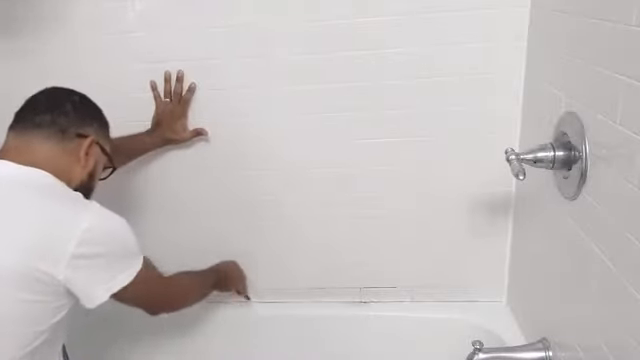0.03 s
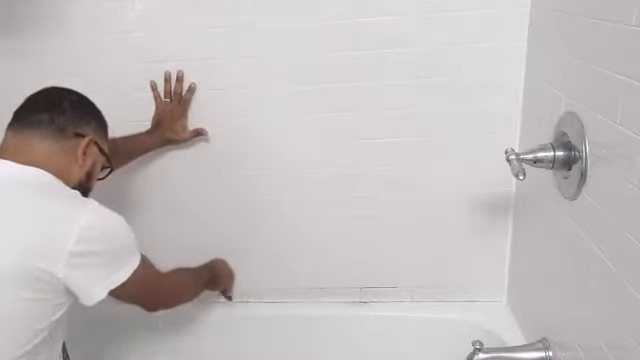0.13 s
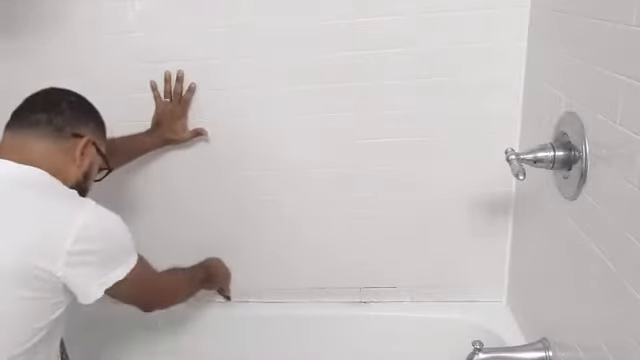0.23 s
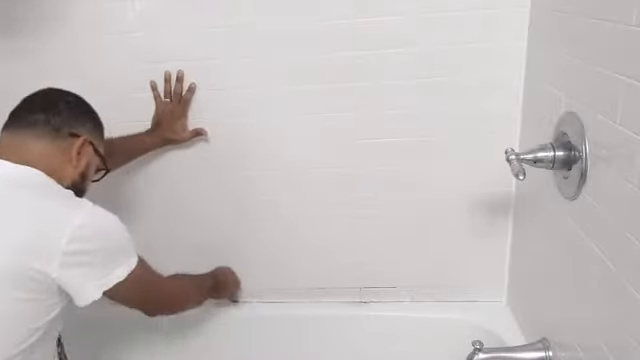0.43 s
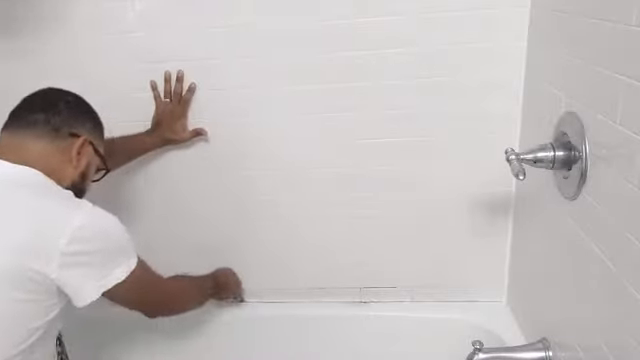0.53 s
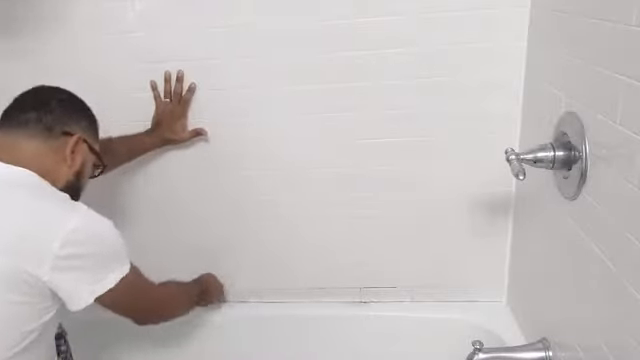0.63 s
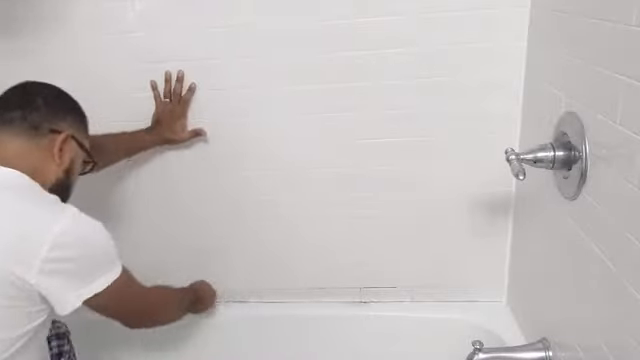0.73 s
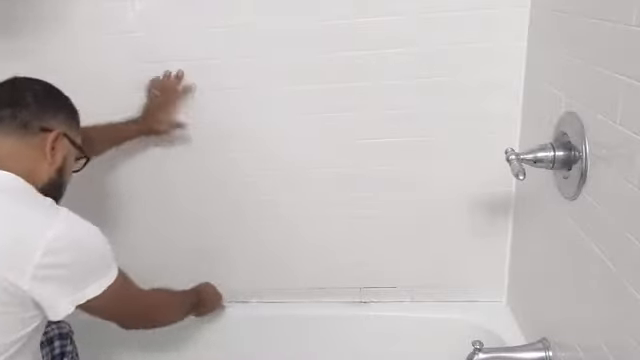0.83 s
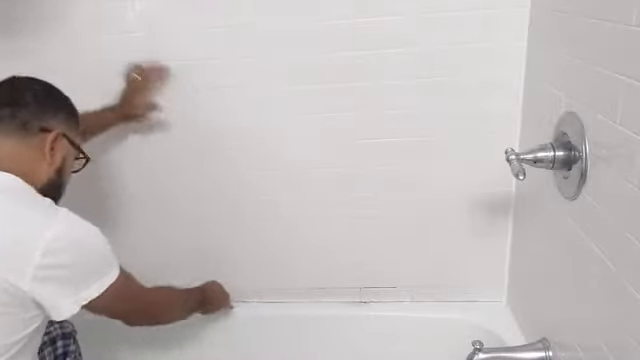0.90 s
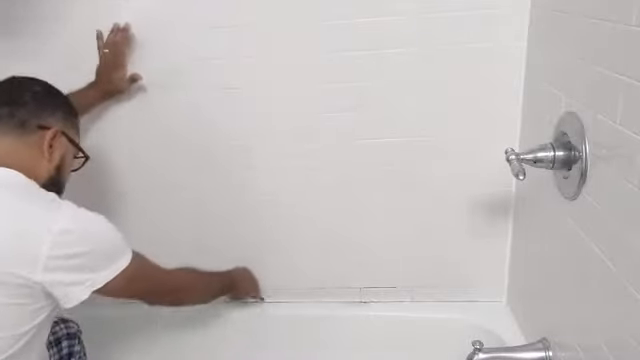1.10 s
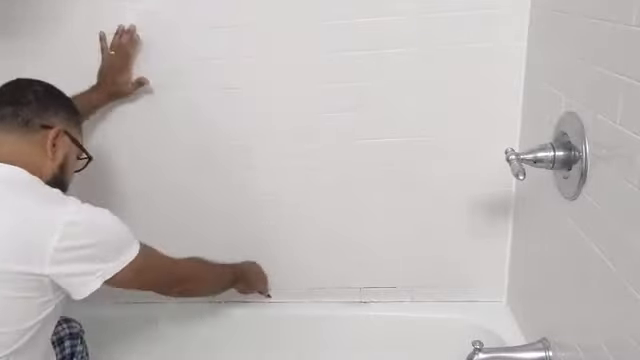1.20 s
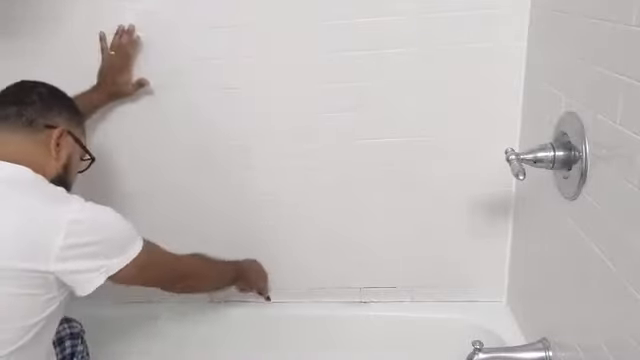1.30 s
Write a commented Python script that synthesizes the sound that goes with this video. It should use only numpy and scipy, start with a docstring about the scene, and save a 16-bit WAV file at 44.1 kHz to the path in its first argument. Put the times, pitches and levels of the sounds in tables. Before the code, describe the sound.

Close by in a small tiled bathroom, a blade scrapes grittily between tub and wall twice, first sharp and squeaky, then heavier. The hollow tub knocks and thuds softly as the scraping fades to quiet.

```python
"""A small tiled bathroom, heard in stereo from close by the tub. A steel hand tool scrapes old caulk
from the joint between tub and wall: one sharp stroke, then a duller, heavier one. The edge sticks and
slips; each slip crumbles grit, rings the blade and shakes the wall and the hollow tub. Now and then
the blade squeaks or catches. The tiles ring on over the faint air of the house, and the tub gives soft
low thuds as weight shifts against it."""
import sys
import numpy as np
from scipy import signal
from scipy.fft import rfft, irfft
from scipy.io import wavfile
from scipy.ndimage import uniform_filter1d

SR = 44100
rng = np.random.default_rng(int(sys.argv[2]) if len(sys.argv) > 2 else 0)


def wrap_up_sound(samples):
    """Save the sound to the file named by the first command line argument, as 16-bit audio."""
    columns = np.atleast_2d(samples).T
    # keep every value between -1 and 1, then stretch to whole-number steps
    tamed = np.clip(columns, -1, 1)
    steps = np.round(tamed * 32767).astype(np.int16)
    wavfile.write(sys.argv[1], SR, steps)


N = 59535
T = np.arange(N) / SR
FREQS = np.maximum(np.arange(N + 1) * SR / (2 * N), 1)

# spectra of the room tone and the scrape's parts (frequency [Hz], relative density [dB])
AIR_SPECTRUM = [(20, -4.5), (35, 2), (60, -11), (100, -18.5), (200, -10), (450, -10.5), (800, -12),
                (1500, -16.5), (4000, -29.5), (8000, -34.5), (15000, -33.5)]
TUB_SPECTRUM = [(70, -34.5), (115, -28), (180, 0), (260, 1), (400, 3), (560, -8.5), (900, -12.5),
                (1600, -46), (4000, -38.5)]
WALL_SPECTRUM = [(100, -35), (280, -21.5), (450, -5), (620, -5), (800, -4), (980, -7), (1200, -12.5),
                 (1500, -12.5), (2500, -19.5), (6000, -52)]
RASP_SPECTRUM = [(300, -26.5), (1000, -13.5), (1900, -11.5), (2700, -0.5), (3300, 5), (4400, 0),
                 (5300, -3.5), (6500, -11), (15000, -28)]
GRIT_SPECTRUM = [(1500, -27.5), (4000, 4.5), (5500, 3.5), (7000, -1.5), (8300, -1), (9300, 3),
                 (11800, -1.5), (13000, 1), (15000, -8.5)]
TICK_SPECTRUM = [(2000, -26), (6000, -5), (11000, -8), (13000, 0), (15000, 4)]
# pushes of the tool and how hard they drive each part (start [s], attack [s], length [s], tub [dB],
# wall [dB], free blade [dB], pressed blade [dB], rasp [dB], grit [dB])
TOOL_PUSHES = [(0.0, 0.00033, 0.0057, -53.5, -59.5, -67, -73, -37.5, -49),
               (0.043, .01, 0.056, -77, -64.5, -90, -69, -67, -68),
               (0.157, 0.0039, 0.0055, -73, -58, -80, -72, -49.5, -54),
               (0.175, 0.013, 0.031, -60.5, -60, -70, -56.5, -42, -46.5),
               (0.219, 0.0047, 0.02, -59, -46.5, -32.5, -47, -29.5, -31),
               (0.242, 0.0027, 0.043, -43, -33, -42.5, -41.5, -37.5, -42),
               (0.32, 0.0019, 0.037, -82, -41, -62, -49, -48.5, -69),
               (0.372, 0.0022, 0.041, -68, -38, -60, -41, -45, -53),
               (0.426, 0.0068, 0.037, -59.5, -48.5, -61, -62, -56, -63),
               (0.505, .014, .042, -61.5, -57, -90, -55.5, -50.5, -52),
               (0.561, .001, 0.011, -81, -66, -87, -66, -47.5, -45.5),
               (0.578, 0.0084, 0.099, -68.5, -65, -73, -69, -53.5, -61),
               (0.668, 0.014, 0.067, -65, -50, -79, -60, -45.5, -50.5),
               (0.687, 0.0071, 0.0225, -41, -56, -80, -70, -77, -71),
               (0.729, 0.0077, 0.028, -52, -39.5, -63, -57, -38, -45),
               (0.755, 0.0044, 0.036, -33.5, -39.5, -48, -77, -37.5, -45),
               (0.794, 0.0058, 0.028, -43, -35.5, -74, -50.5, -37.5, -49),
               (0.838, 0.0054, 0.025, -47, -48.5, -64, -75, -47, -56),
               (0.868, 0.007, 0.079, -68, -60, -85, -61, -51.5, -50),
               (0.977, 0.011, .04, -62.5, -85, -96, -92, -62, -90),
               (1.323, 0.0022, .03, -65, -76, -86, -70, -58, -69)]
# modes of the tub, the free blade, the pressed (damped) blade, its thin edge, the floor's sway
# and the tub's boom (frequency [Hz], relative energy [dB], t60 [s])
TUB_RING_MODES = [(135.3, -9, 0.28), (189.2, 1, 0.16), (261.5, -6, .17), (337, -3.5, 0.21),
                  (396.8, 0, 0.32), (466, -1, 0.23), (570, -17, 0.36), (736, -15, 0.19), (876, -7, .2)]
FREE_BLADE_MODES = [(1748, -1, 0.081), (1767, -2, 0.044), (2790, 2.5, 0.066), (4060, -13, .05),
                    (5025, -6.5, 0.041), (11200, -19, .015), (11500, -4, .015)]
PRESSED_BLADE_MODES = [(1719, -4, 0.013), (1800, 1, 0.015), (2098, -5, 0.048), (2234, -9, 0.029),
                       (2722, -10.5, 0.051)]
BLADE_EDGE_MODES = [(2667, 5.5, 0.034), (2794, -5.5, 0.069), (3119, -1, 0.037), (3557, -5, 0.12),
                    (4380, -15, 0.021), (5360, -10.5, 0.045)]
FLOOR_SWAY_MODES = [(23.2, 6, 0.63), (51, -11, 1), (74.5, -9.5, .35)]
TUB_BOOM_MODES = [(133, 1.5, 0.33), (162, -7.5, 0.047), (215.3, -3, 0.2)]
# decay of the tiled room (frequency [Hz], t60 [s])
ROOM_DECAY = [(150, 0.34), (400, 0.77), (900, 0.53), (2500, 0.48), (6000, 0.61), (14000, 0.37)]
# likeness of left and right at the microphone (frequency [Hz], correlation [-1..1])
MIC_CORRELATION = [(30, 1), (70, 0.11), (150, 0.93), (300, 0.86), (600, 0.45), (1500, -0.16),
                   (4000, -0.015), (14000, -0.2)]
# the blade locks into a squeak (start [s], length [s], pitch [Hz], level into the room [dB])
BLADE_SQUEAKS = [(0.214, 0.028, 1765, -36), (0.257, 0.04, 1726, -39), (0.773, 0.098, 3088, -53.5)]
# weight shifts against the tub (time [s], sway peak [dB], boom peak [dB])
WEIGHT_SHIFTS = [(0.246, -64, -50), (0.51, -86, -59), (0.636, -72, -52.5), (0.69, -68, -48),
                 (0.937, -49, -90), (1.15, -42.5, -51.5), (1.327, -63, -57)]
# the tool catches on the joint (time [s], knock drive [dB], tick drive [dB])
TOOL_CATCHES = [(0.277, -18.5, -28), (0.561, -55, -31), (0.776, -13.5, -32), (0.919, -29.5, -38)]

SLIPS_PER_S, SLIP_SCATTER, SLIP_SPREAD_DB = 480, .55, 2
CRUMBS_PER_S, CRUMB_SPREAD_DB, CRUMBLE_S = 6800, 4, 0.0013
RELEASE_S = 0.0063
LEDGE_GAIN, LEDGE_NEAR_S, LEDGE_FAR_S = 0.82, .0004, .0025  # the tub's ledge reflects the edge
TUB_RING_DB, TUB_KNOCK_DB, TUB_LOW_CUT_HZ = -3, 1.5, 108
EDGE_RING_DB, EDGE_RASP_DB = -5.5, -2
BUILD_S, EARLY_DB, EARLY_T60_S = .001, 5.5, 0.17  # first reflections inside the alcove
SQUEAK_FADE_S, SQUEAK_WOBBLE, WOBBLE_PER_S = 0.0059, 0.0119, 350
AIR_DB, DIRECT_DB, TUB_ROOM_DB, TUB_DIRECT_DB = -62, -9, -10, -1
LEFT_DB, TREBLE_RIGHT_DB, TOP_HZ = 0.43, 1.5, 15150


def undb(db):
    """Decibels to gain."""
    return 10 ** (np.asarray(db) / 20)


def curve(points, hz=FREQS):
    """Read a table on a log-frequency axis."""
    freqs, values = np.array(points, float).T
    return np.interp(np.log(hz), np.log(freqs), values)


def unit(response):
    """Scale a response to unit energy."""
    return response / np.sqrt(np.sum(response ** 2, axis=-1, keepdims=True))


def shape(sound, gain):
    """Apply a gain per frequency."""
    return irfft(rfft(sound, 2 * N) * gain)[..., :N]


def through(sound, response):
    """Send a sound through a response."""
    return shape(sound, rfft(response, 2 * N))


def colour(spectrum):
    """Short causal response with the given spectrum."""
    cepstrum = irfft(np.log(undb(curve(spectrum))))
    causal = 2 * cepstrum[:N] * (T > 0)
    return unit(irfft(np.exp(rfft(causal, 2 * N)))[:N])


def decay(t60):
    """Envelope that falls 60 dB in t60 seconds."""
    return np.exp(-np.log(1000) * T / t60)


def ring(modes):
    """Response of a body: decaying sines of alternating sign."""
    return unit(sum((-1) ** k * undb(db) * unit(np.sin(2 * np.pi * hz * T) * decay(t60))
                    for k, (hz, db, t60) in enumerate(modes)))


def stereo(pair):
    """Blend two unrelated signals into left and right, most alike in the bass."""
    likeness = curve(MIC_CORRELATION)
    mid, side = shape(pair, np.sqrt(np.array([1 + likeness, 1 - likeness]) / 2))
    return np.array([mid + side, mid - side])


def room_tone():
    """Still air of the house: faint rumble and hiss all around the microphone."""
    return undb(AIR_DB) * stereo(through(rng.standard_normal((2, N)), colour(AIR_SPECTRUM)))


def friction():
    """Uneven slips of the edge, and the shower of crumbs that follows each."""
    gap, size = rng.standard_normal((3000, 2)).T
    at = (np.cumsum(np.exp(SLIP_SCATTER * gap)) / SLIPS_PER_S * SR).astype(int)
    slips = np.bincount(at[at < N], undb(SLIP_SPREAD_DB * size[at < N]), N)
    shower = np.sqrt(np.abs(through(slips ** 2, np.exp(-T / CRUMBLE_S))))
    breaks = rng.random(N) < CRUMBS_PER_S / SR
    crumbs = breaks * undb(CRUMB_SPREAD_DB * rng.standard_normal(N))
    return slips - slips.mean(), shower * crumbs * np.sign(rng.standard_normal(N))


def scraper():
    """Each push bites, holds and lets go; slips shake tub and wall, crumbs ring the blade and hiss."""
    slips, crumbs = friction()
    drive = np.zeros((7, N))  # tub, wall, free blade, pressed blade, rasp, grit, tick
    for start, attack, length, *levels in TOOL_PUSHES:
        bite = np.clip((T - start) / attack, 0, 1)
        push = bite * np.exp(-np.maximum(T - start - length, 0) / RELEASE_S)
        lag_s = rng.uniform(LEDGE_NEAR_S, LEDGE_FAR_S)
        echoed = crumbs + LEDGE_GAIN * np.roll(crumbs, int(lag_s * SR))
        force = unit(np.array([slips, slips, crumbs, crumbs, echoed, echoed]) * push)
        drive[:-1] += undb(levels)[:, None] * force * np.linalg.norm(push)
    drive[[0, -1]] += catches()
    edge = undb(EDGE_RING_DB) * ring(BLADE_EDGE_MODES) + undb(EDGE_RASP_DB) * colour(RASP_SPECTRUM)
    bodies = np.array([undb(TUB_KNOCK_DB) * colour(TUB_SPECTRUM), colour(WALL_SPECTRUM),
                       ring(FREE_BLADE_MODES), ring(PRESSED_BLADE_MODES), edge,
                       colour(GRIT_SPECTRUM), colour(TICK_SPECTRUM)])
    scrape, tub_force = through(drive, bodies).sum(axis=0), drive[0]
    return scrape, tub_force


def tub_ring(force):
    """The hollow tub, close to the microphone, rings under the tool's force."""
    low_cut = signal.butter(2, TUB_LOW_CUT_HZ, "high", fs=SR, output="sos")
    return through(force, signal.sosfilt(low_cut, undb(TUB_RING_DB) * ring(TUB_RING_MODES)))


def bathroom(sound):
    """The microphone gets weak direct sound and a dense, bright tail off the tiles; treble leans right."""
    noise, tail = rng.standard_normal((2, N)), 0
    for band_hz, t60 in ROOM_DECAY:
        band = curve([(hz, hz == band_hz) for hz, _ in ROOM_DECAY])
        fade = decay(t60) + undb(EARLY_DB) * decay(EARLY_T60_S)
        tail += shape(noise, band) * unit((1 - np.exp(-T / BUILD_S)) * fade)
    power = uniform_filter1d(np.abs(rfft(tail, 2 * N)) ** 2, size=60)
    flat_tail = shape(tail, power ** -.5)
    reverb = through(sound, stereo(flat_tail))
    lean_db = curve([(6000, -LEFT_DB), (13000, TREBLE_RIGHT_DB)])
    return shape(reverb + undb(DIRECT_DB) * sound, undb(np.array([-lean_db, lean_db]) / 2))


def squeaks():
    """Short, unsteady tones while the edge sticks and slips in step with the blade."""
    out, window = 0, int(SR / WOBBLE_PER_S)
    wobble = uniform_filter1d(rng.standard_normal(N), window) * np.sqrt(window)
    for start, length, hz, db in BLADE_SQUEAKS:
        gate = np.clip(np.minimum(T - start, start + length + SQUEAK_FADE_S - T) / SQUEAK_FADE_S, 0, 1)
        phase = 2 * np.pi * np.cumsum(hz * (1 + SQUEAK_WOBBLE * wobble)) / SR
        out += undb(db) * gate * np.sqrt(2) * np.sin(phase)
    return out


def thuds():
    """Shifting weight sways the floor and draws a soft boom from the tub."""
    out, bodies = 0, (ring(FLOOR_SWAY_MODES), ring(TUB_BOOM_MODES))
    for start, *levels in WEIGHT_SHIFTS:
        for db, body in zip(levels, bodies):
            out += undb(db) * np.interp(T - start, T, body) / np.abs(body).max()
    return out


def catches():
    """The tool catches on the joint: impulses that drive a knock on the tub and a bright tick."""
    impulses = np.zeros((2, N))
    for start, *levels in TOOL_CATCHES:
        impulses[:, int(start * SR)] += undb(levels)
    return impulses


def scene():
    """At the microphone: scraping in the tiled room, the tub close by, thuds and room tone."""
    scrape, tub_force = scraper()
    tub = tub_ring(tub_force)
    room = bathroom(scrape + squeaks() + undb(TUB_ROOM_DB) * tub)
    return room + undb(TUB_DIRECT_DB) * tub + thuds() + room_tone()


def record(dry):
    """The recorder cuts the top treble steeply."""
    return signal.sosfilt(signal.ellip(10, .2, 80, TOP_HZ, fs=SR, output="sos"), dry)


dry = scene()
out = record(dry)
wrap_up_sound(out)
```